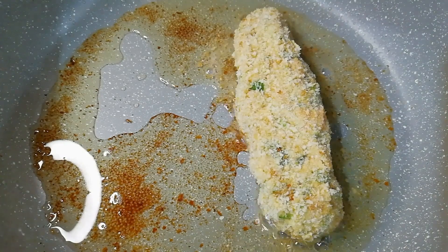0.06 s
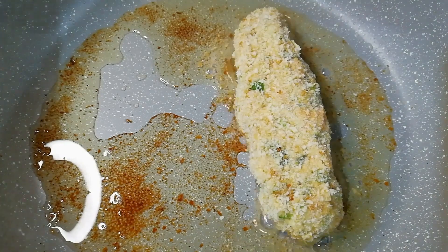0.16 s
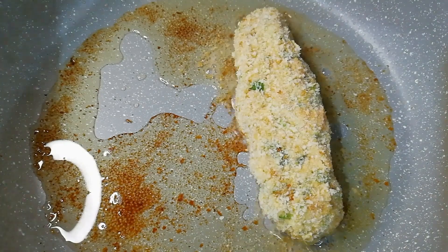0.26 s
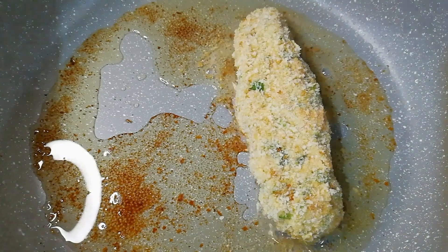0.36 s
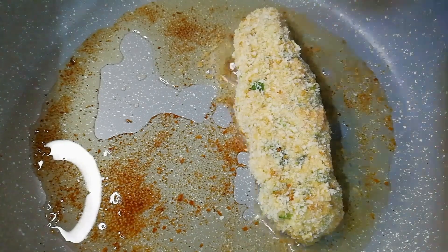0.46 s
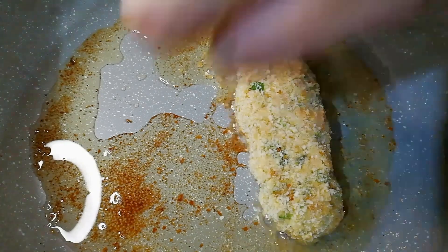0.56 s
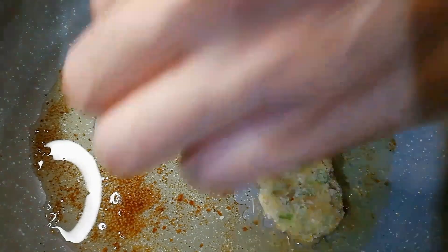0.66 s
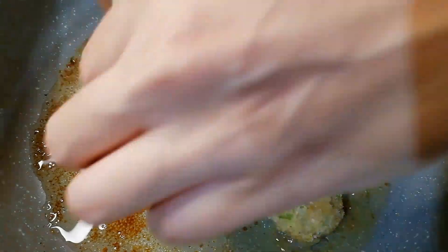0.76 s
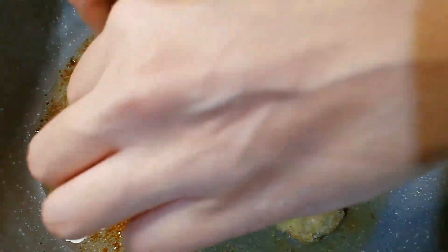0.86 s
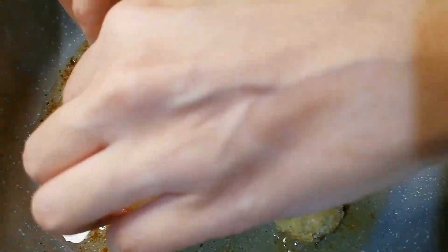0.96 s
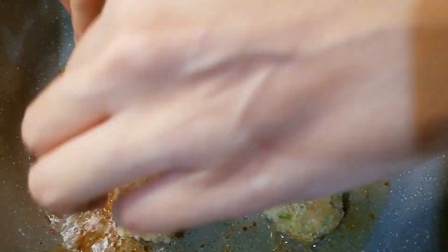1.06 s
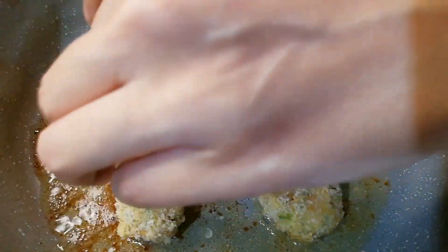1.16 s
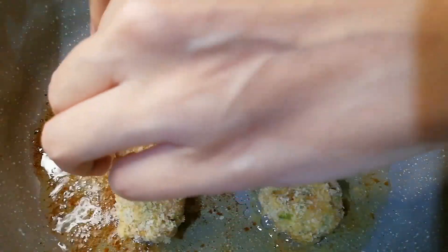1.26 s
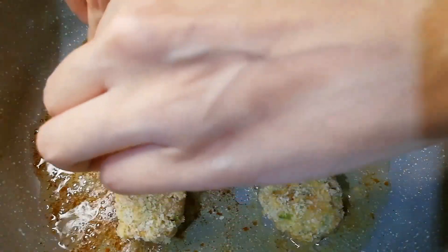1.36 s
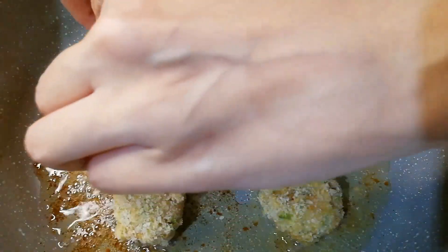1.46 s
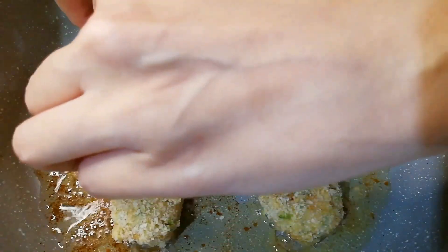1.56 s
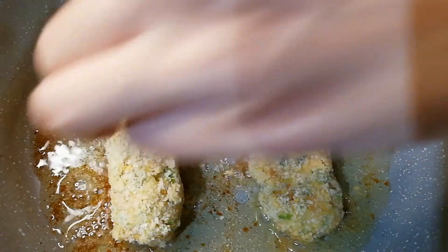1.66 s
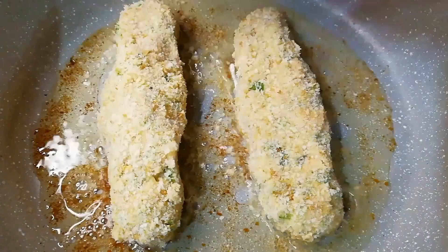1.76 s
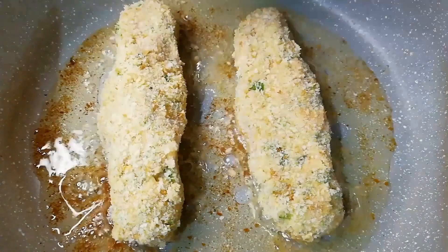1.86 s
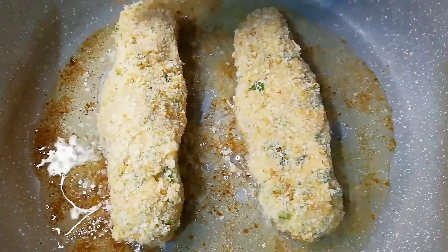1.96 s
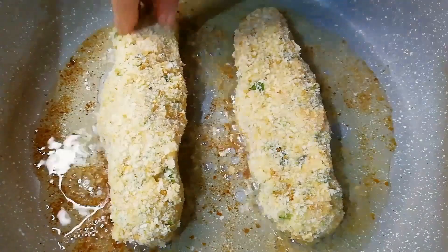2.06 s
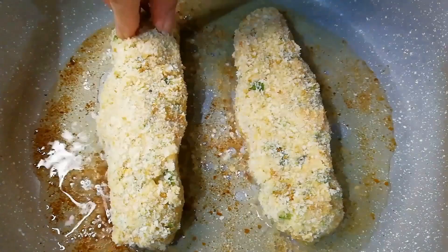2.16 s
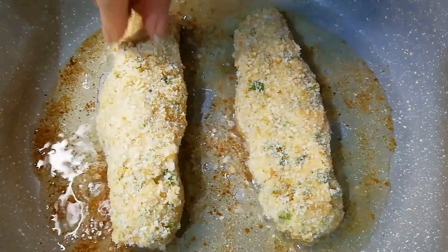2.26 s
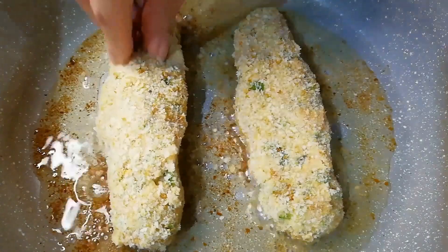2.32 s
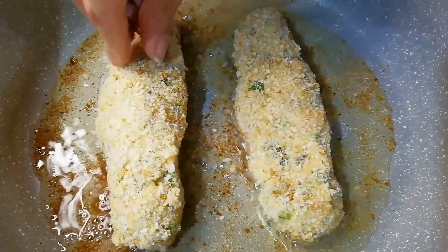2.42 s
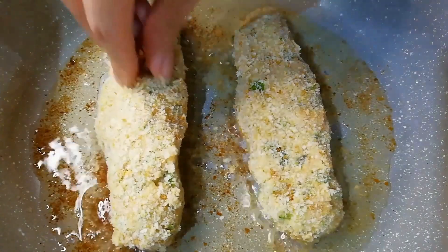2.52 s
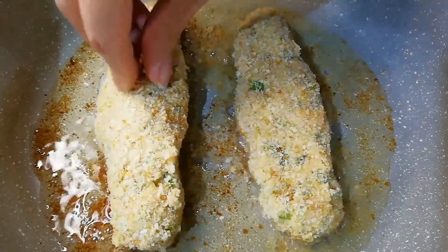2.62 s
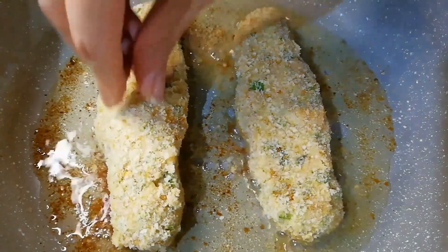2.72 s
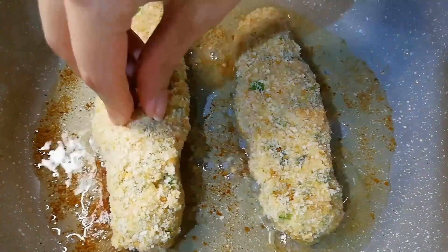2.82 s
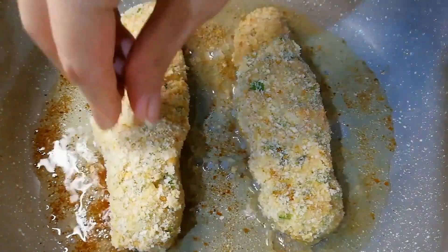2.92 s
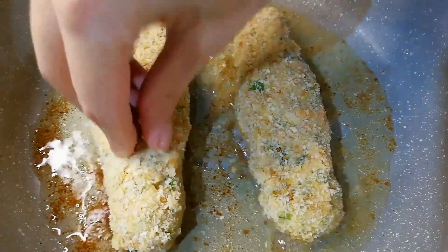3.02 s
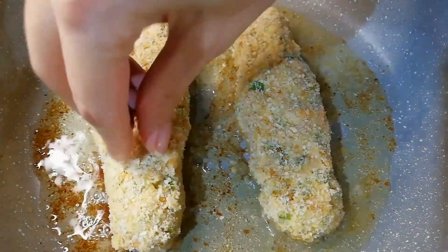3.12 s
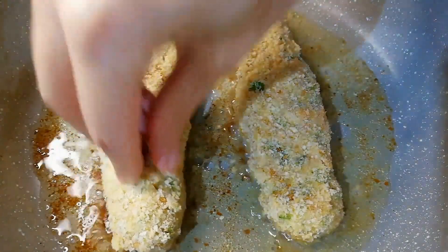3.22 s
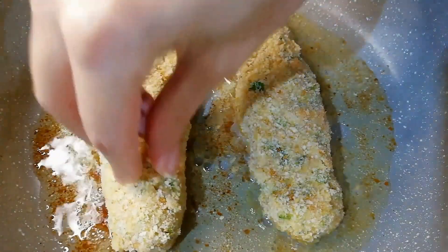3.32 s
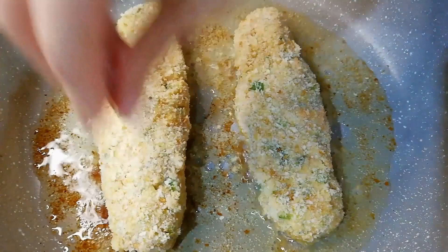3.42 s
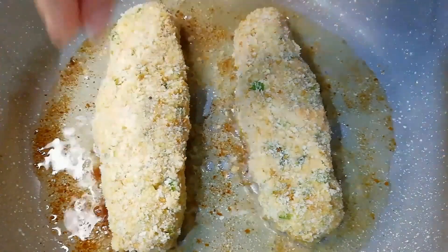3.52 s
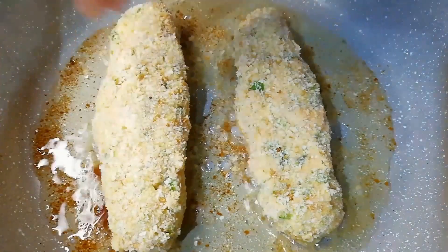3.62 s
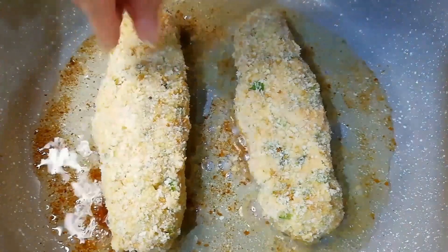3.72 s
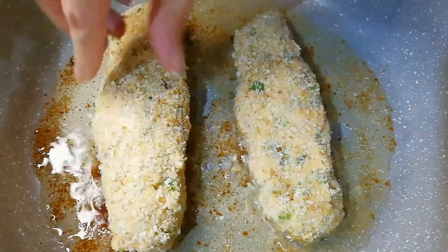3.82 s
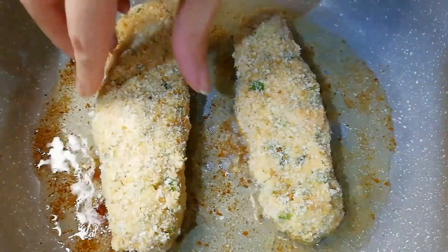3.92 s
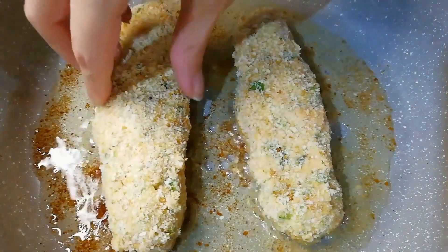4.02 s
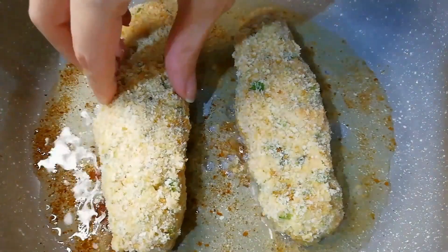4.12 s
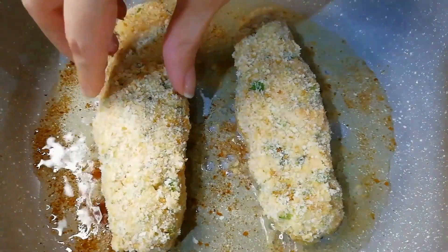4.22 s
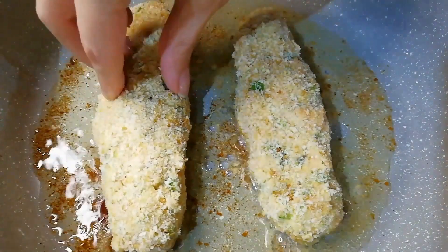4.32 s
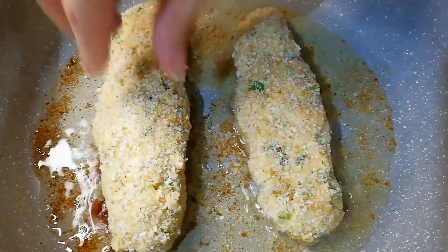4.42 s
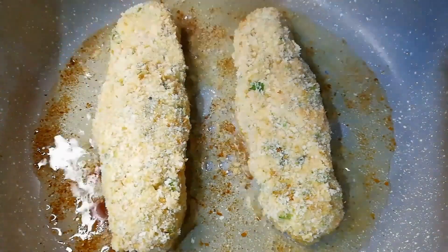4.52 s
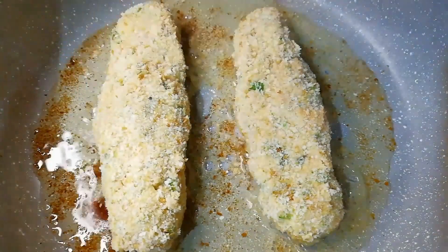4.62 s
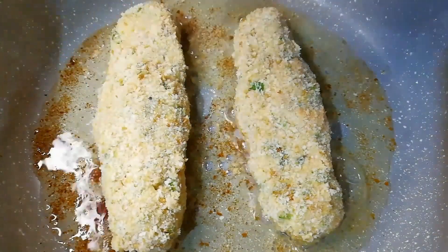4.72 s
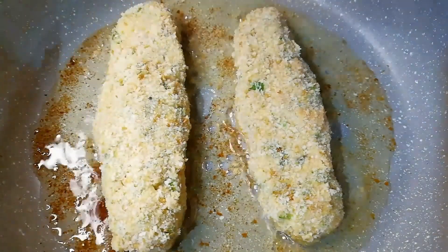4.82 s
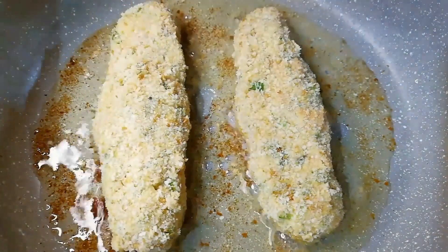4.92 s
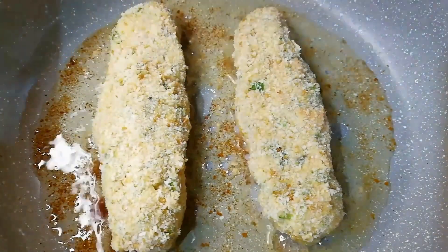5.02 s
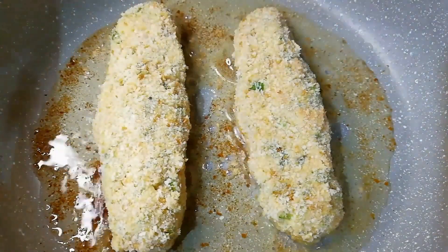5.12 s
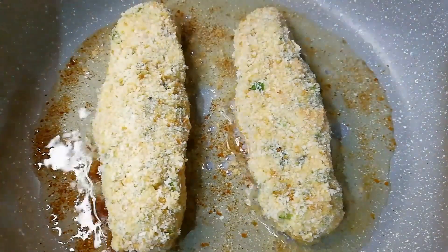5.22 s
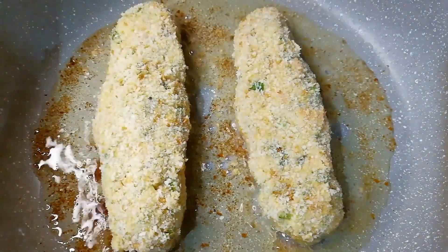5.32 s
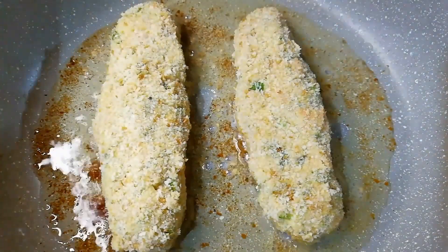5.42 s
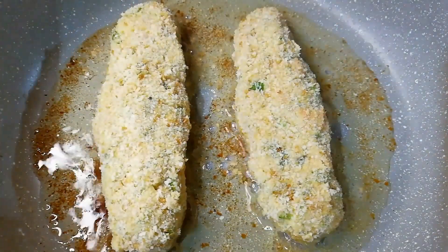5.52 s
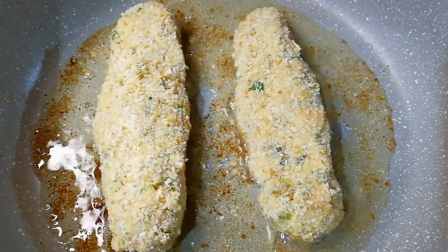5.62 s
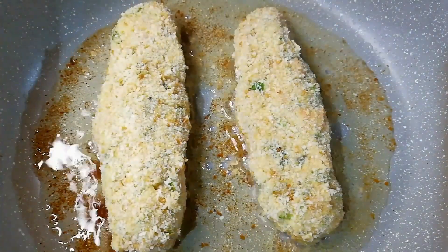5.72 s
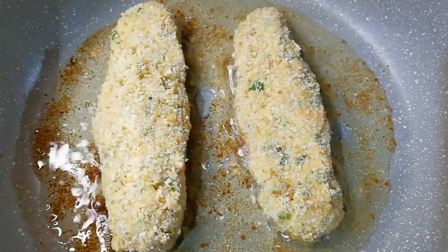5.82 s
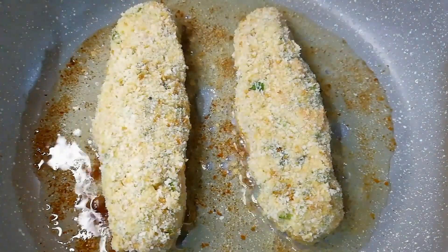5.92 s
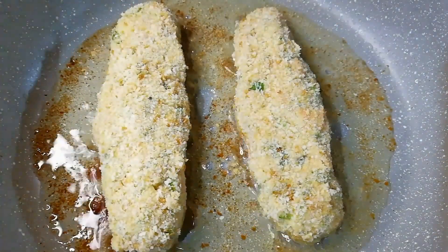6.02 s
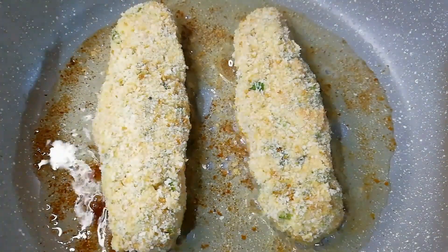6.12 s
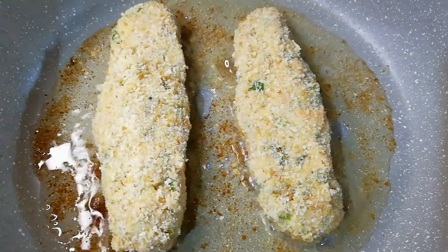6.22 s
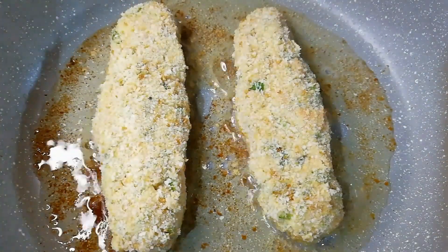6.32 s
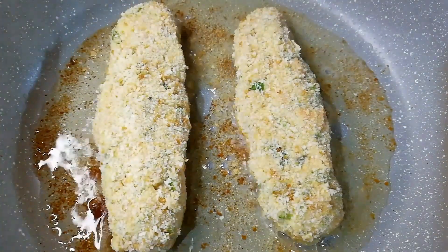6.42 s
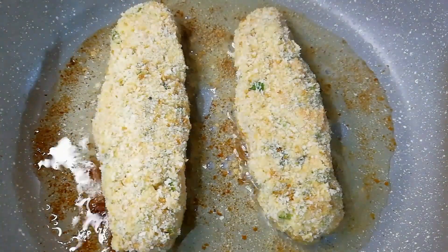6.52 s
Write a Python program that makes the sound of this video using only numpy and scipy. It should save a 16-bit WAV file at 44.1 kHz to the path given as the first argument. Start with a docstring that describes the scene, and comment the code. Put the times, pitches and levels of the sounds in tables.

```python
"""Cutlets frying in shallow oil

Close above the pan, in stereo. Steam bubbles burst as hiss, fine crackle and single pops; large
ones gurgle and ring the pan. A second breaded cutlet is laid in, held down and let go: the boiling
jumps, then settles. Steam squeaks once from under the crust. An extractor fan drones behind."""
import sys
import numpy as np
from scipy import signal
from scipy.fft import rfft, irfft
from scipy.io import wavfile
from scipy.ndimage import uniform_filter1d

SR = 44100
rng = np.random.default_rng(int(sys.argv[2]) if len(sys.argv) > 2 else 0)


def generate_wav(signal):
    """Clip the signal to [-1, 1] and save it as 16-bit WAV at the path in sys.argv[1]."""
    frames = np.transpose(np.atleast_2d(signal))
    scaled = np.clip(frames, -1, 1) * 32767
    pcm = np.round(scaled).astype(np.int16)
    wavfile.write(sys.argv[1], SR, pcm)


N = 289717
TIME_S = np.arange(N) / SR

# stereo image of the noise: (frequency [Hz], coherence [0-1], lead of left [rad])
COHERENCE = [(40, .99, 0), (170, .75, .1), (300, .1, .5), (430, .5, 2.4), (580, .8, 2.5), (690, .2, 1.8),
             (780, .7, 1), (1150, .62, .6), (1450, .5, .5), (1800, .25, 2), (2300, .5, 3.3),
             (3100, .1, 3.3), (4200, .35, 9), (9500, .2, 16.6), (16000, .2, 31)]
# balance of the noise: (frequency [Hz], left-right [dB])
BALANCE = [(60, 3), (100, -4), (180, 2.5), (310, -3.5), (550, 4.5), (950, 4), (1650, -0.5), (2860, 2),
           (4970, -0.5), (8640, 1), (15000, -1)]
# fan air noise: (frequency [Hz], relative density [dB])
FAN_SPECTRUM = [(12, -19), (20, 3), (75, -6.5), (234, -14), (430, -15), (650, -12.5), (776, -9.5),
                (982, -13.5), (1270, -7), (1480, -13.5), (1810, -15.5), (2200, -51), (2860, -57),
                (4840, -120)]
# steady resonant peaks in the drone, from hood and pan: (frequency [Hz], width [Hz], lift [dB])
DRONE_PEAKS = [(46, 23, 3.5), (100, 16, 7.5), (169, 19, 4), (776, 69, 7.5), (923, 17, 10.5),
               (1287, 110, 2.5), (1700, 56, -1)]
# pan resonances: (frequency [Hz], width [Hz], lift [dB])
PAN_MODES = [(787, 43, 10.5), (1225, 75, 6.5), (1684, 60, 6.5)]
# large bubbles and pushed oil: (frequency [Hz], relative density [dB])
GURGLE_SPECTRUM = [(53, -72), (90, -16), (172, -11.5), (274, -42.5), (572, -10), (723, -25.5), (778, -15.5),
                   (1040, -5), (1210, -8), (2020, -7.5), (3000, -6), (3900, -16), (6600, -120)]
# small bubbles: (frequency [Hz], relative density [dB])
FIZZ_SPECTRUM = [(300, -87), (1060, -29), (1800, -8.5), (2570, -9.0), (3000, -4.0), (4140, -2.5),
                 (4740, -0.5), (6360, -1), (6840, -1.5), (8060, -3.0), (11100, -13.0), (15100, -14.5),
                 (16000, -17)]
# steam under the crust: (time [s], pitch [Hz], level [dB], octave re fundamental [dB])
SQUEAK_TRACK = [(2.77, 1820, -68, 4), (2.8, 1800, -61, 11.5), (2.82, 1727, -58, -4), (2.84, 1742, -49.5, 0),
                (2.87, 1744, -57, -2), (2.895, 1743, -54, -6), (2.91, 1770, -58, -4),
                (2.945, 1760, -58, -6)]
# surges of boiling: (time [s], half-length [s], lift [dB], treble change [dB])
BOIL_SURGES = [(1.03, 0.22, 2.5, 0.5), (1.39, 0.037, 5.5, -8.5), (1.472, 0.081, 4, -9),
               (2.114, 0.025, 5.5, -3)]
# single large bubbles: (time [s], peak [dB], pitch [Hz], left-right [dB], t60 [s])
LARGE_POPS = [(0.936, -48, 1190, 0, .04), (0.948, -48, 1230, 4, .04), (0.956, -45, 1620, 2, 0.021),
              (0.963, -43, 1170, -4, 0.021), (2.38, -49, 1350, -2, 0.021), (2.897, -51, 2530, 2, 0.072),
              (3.1559, -45.5, 1210, 3, .027), (3.42, -46, 1700, -7, 0.016), (3.605, -44.5, 1170, 4, 0.024),
              (4.082, -45, 1157, 3, 0.033), (4.9178, -44, 1420, -2, 0.011), (6.5635, -42.5, 1920, 5, 0.019)]
# single small bubbles: (time [s], peak [dB], pitch [Hz], left-right [dB], snap re body [dB], t60 [s])
SMALL_POPS = [(0.0429, -41.5, 7360, 2, -8, 0.011), (0.1489, -39, 5800, 1, -30, 0.0076),
              (0.199, -43.5, 5930, 6, -5, 0.021), (0.2203, -43, 8700, 3, -7, 0.006),
              (0.259, -43, 4630, -5, 7, 0.0055), (0.2894, -42, 7350, 4, -5, 0.018),
              (0.334, -42, 3300, 0, -6, 0.006), (0.4228, -43.5, 5800, 3, -5, 0.0065),
              (0.4876, -40, 4650, 6, -13, 0.01), (0.625, -37, 4520, 0, -34, 0.0092),
              (0.957, -38, 5260, 3, -15, 0.012), (1.1764, -31, 5030, 0, -9, 0.019),
              (1.212, -27.5, 6400, 3, -7, 0.0076), (1.314, -32, 6420, 2, -11, 0.052),
              (1.326, -29.5, 6460, -5, -17, 0.0085), (1.4653, -32, 6570, -1, -19, 0.011),
              (1.59, -39, 7060, 7, -17, 0.0086), (1.6023, -35.5, 6260, 1, -22, 0.014),
              (1.6172, -42, 6930, -7, -23, 0.012), (1.8018, -47, 5980, 0, -15, 0.005),
              (1.881, -36.5, 4550, -1, -17, 0.0043), (1.9145, -40, 6700, -1, -15, 0.006),
              (2.0182, -28.5, 4350, 1, -34, 0.0099), (2.0633, -39, 6400, -2, -22, 0.004),
              (2.0852, -40, 7550, -1, -12, 0.0035), (2.094, -35, 6040, 0, -26, 0.0079),
              (2.104, -35, 6300, -2, -22, 0.0048), (2.1404, -36.5, 8000, 0, -5, 0.008),
              (2.16, -38, 5660, -1, -20, 0.0089), (2.2196, -35.5, 6330, -1, -6, 0.023),
              (2.239, -36, 8250, 3, -9, 0.0071), (2.272, -32.5, 7150, 4, -11, 0.013),
              (2.3383, -35.5, 5160, 3, -15, 0.021), (2.351, -36.5, 6530, -2, -9, 0.0065),
              (2.469, -36, 6840, 5, -5, 0.0051), (2.5466, -40, 5680, -2, -17, 0.006),
              (2.609, -39, 5450, -5, -7, 0.0068), (2.6796, -43, 6300, 0, -15, 0.0069),
              (2.727, -36, 6660, 4, 3, 0.0083), (2.7488, -32.5, 5530, 6, 1.5, 0.0088),
              (2.7533, -30, 7340, 4, -2, 0.0024), (2.8704, -38, 5640, -1, -10, 0.0034),
              (2.9383, -33, 5600, 0, -4, 0.0027), (3.036, -35, 7300, -1, -11, 0.0074),
              (3.1475, -40, 4610, 0, -4, 0.012), (3.1872, -37.5, 7100, 7, -10, 0.006),
              (3.252, -40, 3580, 4, -28, 0.019), (3.264, -32, 7380, -5, -27, 0.0056),
              (3.3287, -37, 4700, 1, -6, 0.006), (3.38, -45.5, 5850, -9, -15, 0.005),
              (3.4196, -42.5, 3270, -4, -30, 0.012), (3.4955, -40, 5480, -2, -14, 0.015),
              (3.641, -28.5, 6680, 1, -24, 0.018), (3.659, -38, 6650, -3, 0, 0.018),
              (3.703, -38.5, 5800, 0, -17, 0.0087), (3.837, -40.5, 6800, -9, -13, 0.0058),
              (3.8794, -44, 6440, 1, -5, 0.018), (4.0747, -34.5, 4640, 7, -25, 0.012),
              (4.113, -39, 8000, 0, -11, 0.011), (4.2293, -46, 4950, 6, -7, 0.005),
              (4.3036, -39, 7050, -5, -18, 0.005), (4.3934, -31.5, 7500, 0, -24, 0.018),
              (4.6561, -33.5, 6560, -5, -29, 0.0051), (4.918, -46, 2900, 8, -8, 0.007),
              (4.992, -39.5, 7020, 4, -10, 0.006), (5.0111, -36, 4900, 3, -18, 0.0045),
              (5.1562, -44, 6200, -1, -17, 0.0053), (5.181, -37.5, 6600, -2, -24, 0.0063),
              (5.2407, -38.5, 4000, 3, -33, 0.0067), (5.304, -34, 4900, 3, -26, 0.0054),
              (5.483, -33, 6640, -2, -28, 0.019), (5.4886, -33.5, 6200, -7, -23, 0.0027),
              (5.498, -46.5, 3000, 1, -20, 0.029), (5.5278, -42.5, 5130, -11, -27, 0.015),
              (5.6995, -39.5, 6760, -5, -11, 0.006), (5.8438, -37, 5420, -1, -21, 0.016),
              (5.865, -37, 7300, 1, 0, 0.0088), (6.022, -39, 6200, 1, -12, 0.014),
              (6.033, -41, 6020, 0, -13, 0.059), (6.202, -37.5, 6200, -3, -21, 0.011),
              (6.2656, -40, 5450, -3, -27, 0.0071), (6.4155, -38.5, 4820, -1, -15, 0.0065),
              (6.434, -40, 7220, 1, -27, 0.01), (6.4372, -43.5, 5500, 3, -22, 0.023),
              (6.4747, -39.5, 4220, 4, -30, 0.006), (6.5195, -39.5, 6430, -2, -9, 0.0063)]

LAND_S, RISE_S, LET_GO_S, RELEASE_S, SETTLE_S = 0.936, 0.045, 1.515, 0.026, 3.3  # second cutlet
FAN_DB, SETTLED_DB = -63, -52
HISS_RE_BOIL_DB, CRACKLE_RE_BOIL_DB = -2, -6.5
TREBLE_HZ, EDGE_HZ = 7400, 15900


def gain(db):
    """Decibels to amplitude."""
    return 10 ** (np.asarray(db) / 20)


def unit_rms(x):
    """Scales to rms 1."""
    return x / np.sqrt(np.mean(x ** 2) + 1e-20)


def drift(smooth, count=N):
    """Random wander, averaged over `smooth` points."""
    return unit_rms(uniform_filter1d(rng.standard_normal(count), size=smooth))


def spectrum_db(table, hz):
    """Interpolates a table over log frequency."""
    table_hz, db = np.transpose(table)
    return np.interp(np.log(hz + 1), np.log(table_hz + 1), db)


def resonance_db(modes, hz):
    """Summed lift of resonance peaks."""
    return sum(db / (1 + ((hz - mode_hz) / (.5 * width_hz)) ** 2) for mode_hz, width_hz, db in modes)


def colour(x, table):
    """Minimum-phase filter: sharp onset, ringing after."""
    hz = abs(np.fft.fftfreq(4096, 1 / SR))
    log_gain = np.log(gain(np.maximum(spectrum_db(table, hz), -80)))
    taps = np.fft.ifft(np.exp(np.conj(signal.hilbert(log_gain)))).real[:1024]
    return signal.oaconvolve(x, taps[None], axes=1)[:, :x.shape[1]]


def treble(x):
    """The part above TREBLE_HZ."""
    hz = np.fft.rfftfreq(x.shape[-1], 1 / SR)
    return irfft(rfft(x) / (1 + (TREBLE_HZ / (hz + 1)) ** 8), x.shape[-1])


def stereo_pair(a, b, hz):
    """Two independent spectra to partly coherent left and right."""
    table_hz, coherence, lead_rad = np.transpose(COHERENCE)
    shared = np.interp(hz, table_hz, coherence)
    lag = np.exp(-1j * np.interp(hz, table_hz, lead_rad))
    right = shared * lag * a + np.sqrt(1 - shared ** 2) * b
    lean = gain(.5 * spectrum_db(BALANCE, hz))
    return np.array([a * lean, right / lean])


def bubbling_noise(table, patch_db, flicker_db):
    """Stereo noise with drifting spectral patches and a broadband flicker."""
    frames, hz = N // 128 + 5, np.fft.rfftfreq(512, 1 / SR)[:, None]
    a, b, c, d, patches = rng.standard_normal((frames, 257, 5)).T
    patches = unit_rms(uniform_filter1d(uniform_filter1d(patches, size=8, axis=0), size=12, axis=1))
    level_db = spectrum_db(table, hz) + patch_db * patches + flicker_db * drift(5, frames)
    spectra = stereo_pair(a + 1j * b, c + 1j * d, hz) * gain(level_db)
    return unit_rms(signal.istft(spectra, nperseg=512, noverlap=384)[1][:, :N])


def place(mix, time_s, peak_db, pan_db, sound):
    """Adds a burst, scaled by its peak short-term rms."""
    start = round(time_s * SR)
    peak = np.sqrt(uniform_filter1d((sound ** 2).mean(0), size=40).max())
    mix[:, start:start + sound.shape[1]] += gain(peak_db + np.outer([.5, -.5], pan_db)) * sound / peak


def kitchen(x, wet_db=-9.5, t60_s=0.085):
    """Adds short reflections from pan, hob and walls."""
    t = np.arange(SR // 4) / SR
    tail = rng.standard_normal((2, len(t))) * gain(-60 * t / t60_s) * (t > .003)
    return x + gain(wet_db) * signal.fftconvolve(x, tail / np.linalg.norm(tail[0]), axes=1)[:, :N]


def fan():
    """Air noise with steady resonant peaks from hood and pan."""
    hz = np.fft.rfftfreq(N, 1 / SR)
    air = stereo_pair(*rfft(rng.standard_normal((2, N))), hz)
    shape_db = spectrum_db(FAN_SPECTRUM, hz) + resonance_db(DRONE_PEAKS, hz)
    return gain(FAN_DB) * unit_rms(irfft(air * gain(shape_db), N))


def squeak(waver=0.0353, sputter_db=2.9):
    """Steam squeezes out under the crust: a raspy whistle with its octave."""
    time_s, *columns = np.transpose(SQUEAK_TRACK)
    pitch_hz, level_db, octave_db = (np.interp(TIME_S, time_s, column) for column in columns)
    phase = 2 * np.pi * np.cumsum(pitch_hz * (1 + waver * drift(120))) / SR
    gate = uniform_filter1d(1. * (TIME_S > time_s[0]) * (TIME_S < time_s[-1]), size=800)
    whistle = np.sin(phase) + gain(octave_db) * np.sin(2 * phase)
    return gate * gain(level_db + sputter_db * drift(120)) * whistle * gain([[1.5], [-1.5]])


def stages(before_db, held_db, freed_db, settled_db):
    """Steps up as the cutlet lands, down as it is let go, then settles."""
    landed = np.clip((TIME_S - LAND_S) / RISE_S, 0, 1)
    let_go = np.clip((TIME_S - LET_GO_S) / RELEASE_S, 0, 1)
    sinking_db = settled_db + (freed_db - settled_db) * np.exp(-np.maximum(TIME_S - LET_GO_S, 0) / SETTLE_S)
    return before_db + landed * (held_db - before_db) + let_go * (sinking_db - held_db)


def boiling():
    """Boiling level and treble gain, with short triangular surges."""
    time_s, half_s, lift_db, tilt_db = np.transpose(BOIL_SURGES)
    surges = np.maximum(1 - abs(TIME_S[:, None] - time_s) / half_s, 0)
    boil_db = stages(before_db=-54, held_db=-41.5, freed_db=-45.5, settled_db=SETTLED_DB)
    treble_db = stages(before_db=-2, held_db=4, freed_db=2.25, settled_db=-1.5)
    return boil_db + surges @ lift_db, treble_db + surges @ tilt_db


def churn(boil_db, rest_db=-62, follow=0.6, splash_db=-40.5, rise_s=0.04, t60_s=0.64):
    """Large bubbles ring the pan; they follow the boiling and splash as the cutlet lands."""
    since_s = np.maximum(TIME_S - LAND_S, 0)
    splash = np.minimum(since_s / rise_s, 1) * gain(splash_db - 60 * since_s / t60_s)
    steady = gain(rest_db + follow * (boil_db - SETTLED_DB))
    gurgle = bubbling_noise(GURGLE_SPECTRUM, patch_db=2.0, flicker_db=1.3)
    pan_response = gain(resonance_db(PAN_MODES, np.fft.rfftfreq(N, 1 / SR)))
    return np.hypot(splash, steady) * unit_rms(irfft(rfft(gurgle) * pan_response, N))


def burst(pitch_hz, t60_s, scatter, ring, rise_s, spread_rad=0.8):
    """One bubble: a snap scattered by the pan walls, and a tone that rises as it opens."""
    t = np.arange(scatter.shape[-1]) / SR
    tone = np.sin(2 * np.pi * pitch_hz * t * (1 + 15 * t) + spread_rad * scatter[..., :1])
    return (scatter + ring * tone) * gain(-60 * t / t60_s) * np.minimum(t / rise_s, 1)


def pops(size=1024, half_width_hz=2300, gurgle_db=-13, long_t60_s=0.022):
    """Single loud bursts: small bubbles snap, with more gurgle if long; large ones bloop."""
    mix, hz = np.zeros((2, N + size)), np.fft.rfftfreq(size, 1 / SR)
    scatter = rfft(rng.standard_normal((len(SMALL_POPS) + len(LARGE_POPS), 2, size))) * (hz > 600)
    fizz, gurgle = gain(spectrum_db(FIZZ_SPECTRUM, hz)), gain(spectrum_db(GURGLE_SPECTRUM, hz))
    for (time_s, peak_db, pitch_hz, pan_db, snap_db, t60_s), paths in zip(SMALL_POPS, scatter):
        body = unit_rms(irfft(paths * fizz / (1 + ((hz - pitch_hz) / half_width_hz) ** 2)))
        low = gain(gurgle_db) * min(t60_s / long_t60_s, 1) ** 2 * unit_rms(irfft(paths * gurgle))
        snap = gain(snap_db) * unit_rms(treble(irfft(paths * (hz < EDGE_HZ))))
        pop = burst(pitch_hz, t60_s, body + low + snap, ring=0.9, rise_s=0.00086)
        place(mix, time_s, peak_db, pan_db, pop)
    for (time_s, peak_db, pitch_hz, pan_db, t60_s), paths in zip(LARGE_POPS, scatter[len(SMALL_POPS):]):
        body = unit_rms(irfft(paths * gurgle))
        place(mix, time_s, peak_db, pan_db, burst(pitch_hz, t60_s, body, ring=1.37, rise_s=0.00063))
    return mix[:, :N]


def crackle(candidates=9000, size=224, base_per_s=500, flurry_db=3.3, spread_db=3.5, half_width_hz=2330):
    """Flurries of tiny bursts, a few larger, each with its own pitch and decay."""
    when, chance, pitch, decay, rank = rng.random((candidates, 5, 1, 1)).transpose(1, 0, 2, 3)
    start, pitch_hz = (when * N).astype(int), 3700 * 3.8 ** pitch
    rate_per_s = base_per_s * gain(flurry_db * drift(900))
    fires = chance * candidates < rate_per_s[start] * N / SR
    strength = fires * gain(spread_db * np.minimum(-np.log(rank), 3.2))
    near_pitch = 1 / (1 + ((np.fft.rfftfreq(size, 1 / SR) - pitch_hz) / half_width_hz) ** 2)
    scatter = unit_rms(irfft(rfft(rng.standard_normal((candidates, 2, size))) * near_pitch))
    t60_s = 0.0023 + 0.011 * decay ** 2
    bursts = strength * burst(pitch_hz, t60_s, scatter, ring=0.97, rise_s=0.00082, spread_rad=2.93)
    index = (start[:, 0] + np.arange(size)).ravel()
    mix = np.array([np.bincount(index, bursts[:, side].ravel(), N + size)[:N] for side in range(2)])
    return unit_rms(colour(mix, FIZZ_SPECTRUM))


def sizzle(boil_db, treble_db):
    """Small steam bubbles: hiss and crackle, as loud and bright as the boiling."""
    hiss = bubbling_noise(FIZZ_SPECTRUM, patch_db=1.5, flicker_db=1.45)
    fizz = gain(HISS_RE_BOIL_DB) * hiss + gain(CRACKLE_RE_BOIL_DB) * kitchen(crackle())
    fizz += (gain(treble_db) - 1) * treble(fizz)
    return gain(boil_db) * fizz


def scene():
    """Boiling drives sizzle and churn; pops and squeak are timed; the fan is steady."""
    boil_db, treble_db = boiling()
    return sizzle(boil_db, treble_db) + churn(boil_db) + kitchen(pops() + squeak()) + fan()


def record(dry):
    """Steep low-pass at EDGE_HZ."""
    taps = signal.firwin(511, EDGE_HZ, window=("kaiser", 9), fs=SR)
    return signal.oaconvolve(dry, taps[None], "same")


dry = scene()
out = record(dry)
generate_wav(out)
```